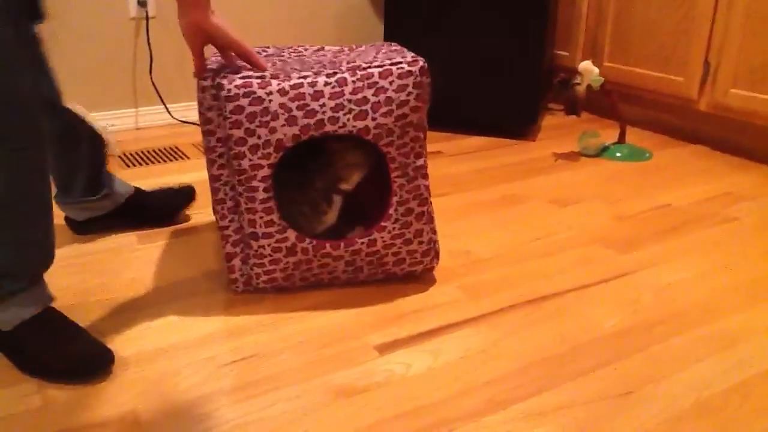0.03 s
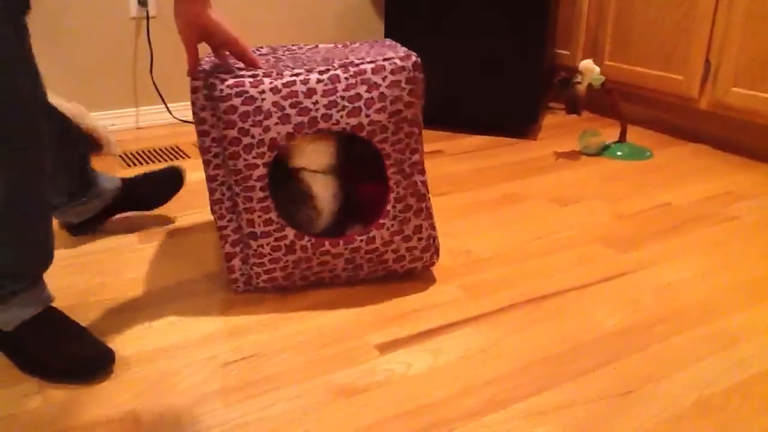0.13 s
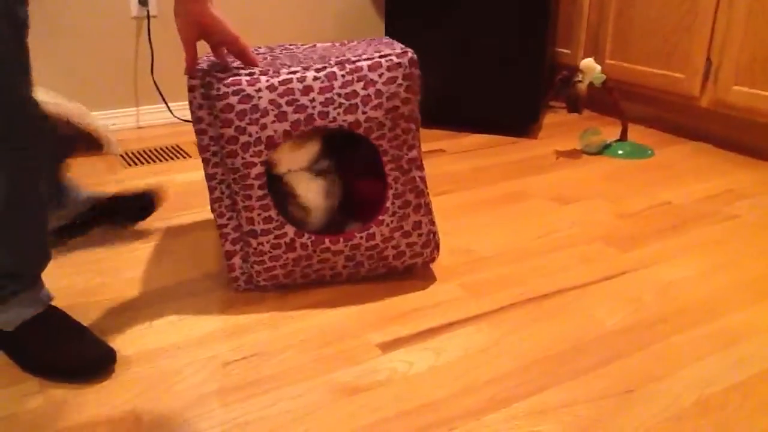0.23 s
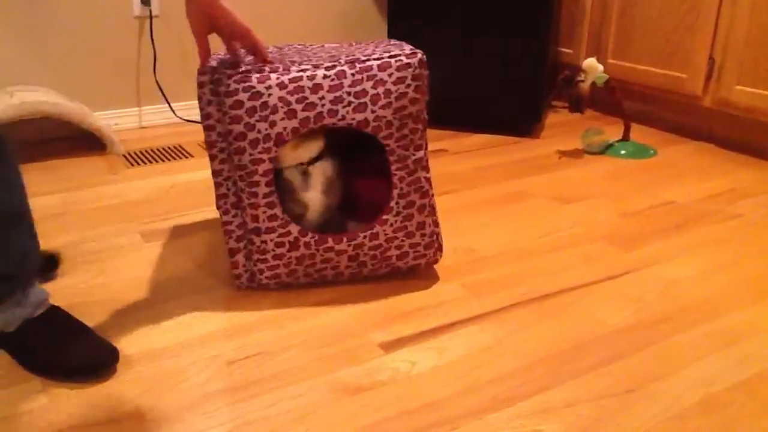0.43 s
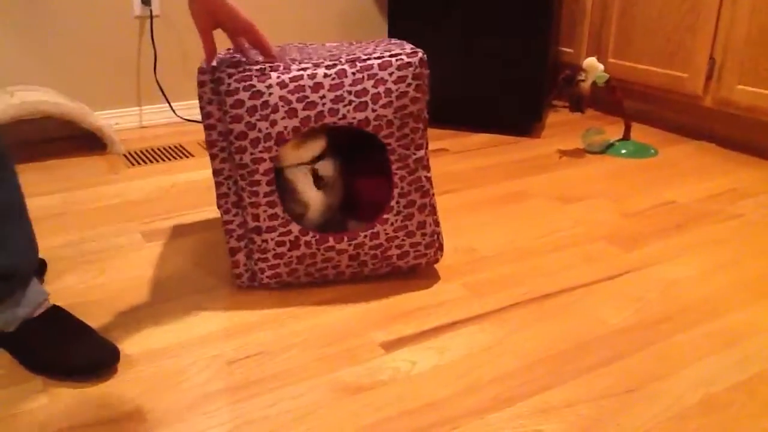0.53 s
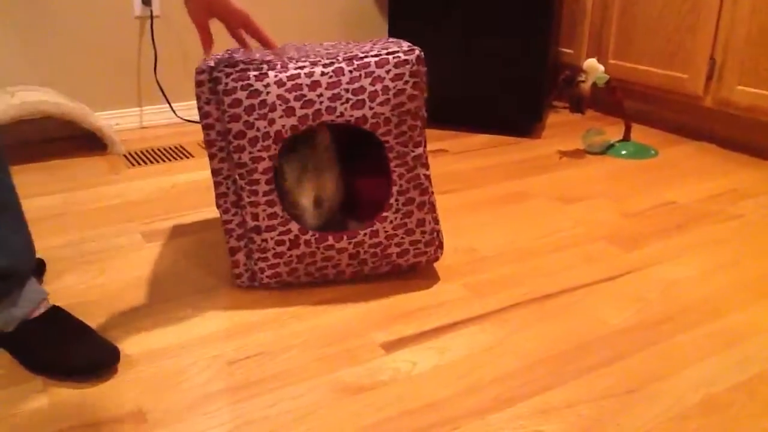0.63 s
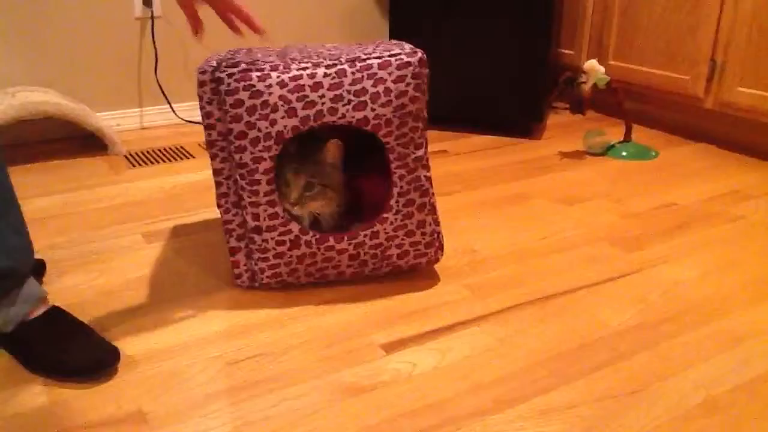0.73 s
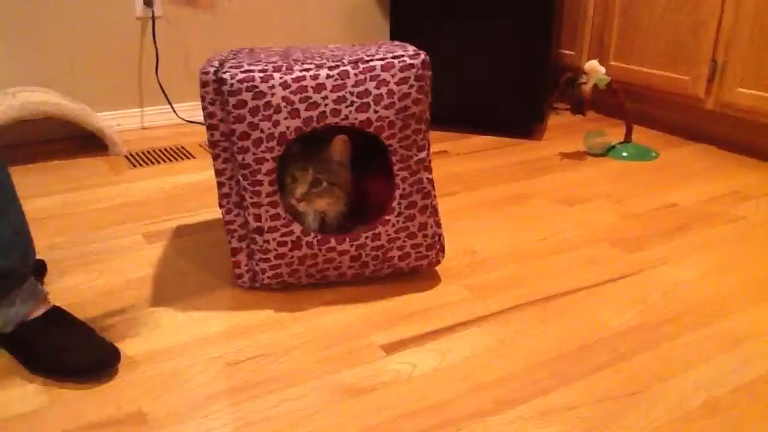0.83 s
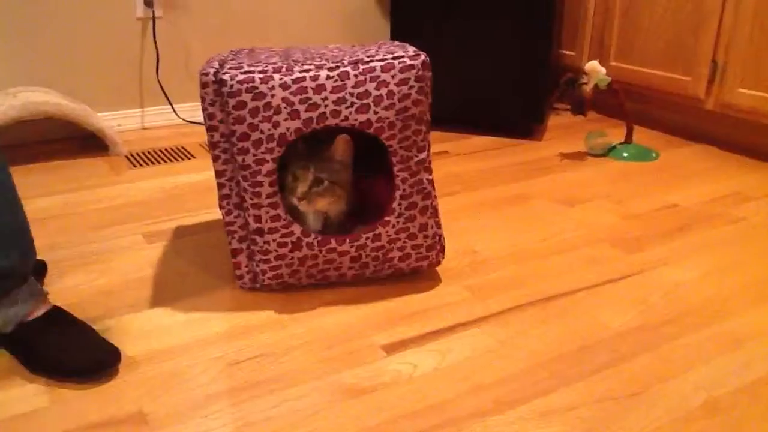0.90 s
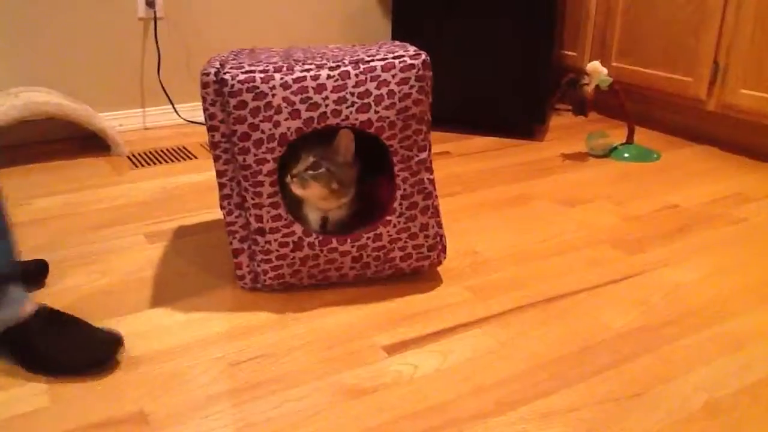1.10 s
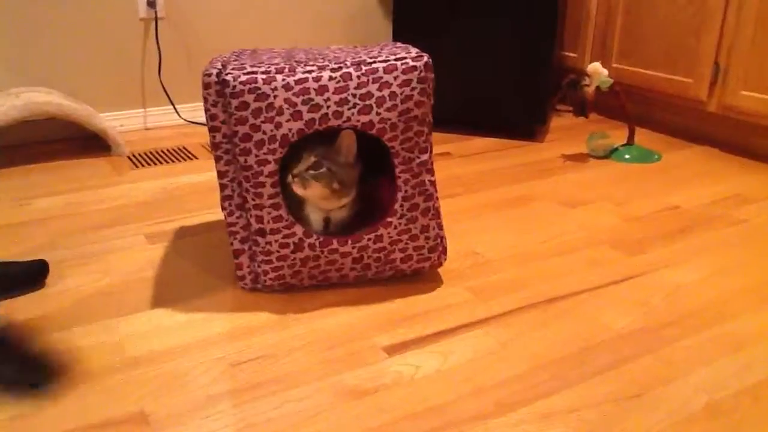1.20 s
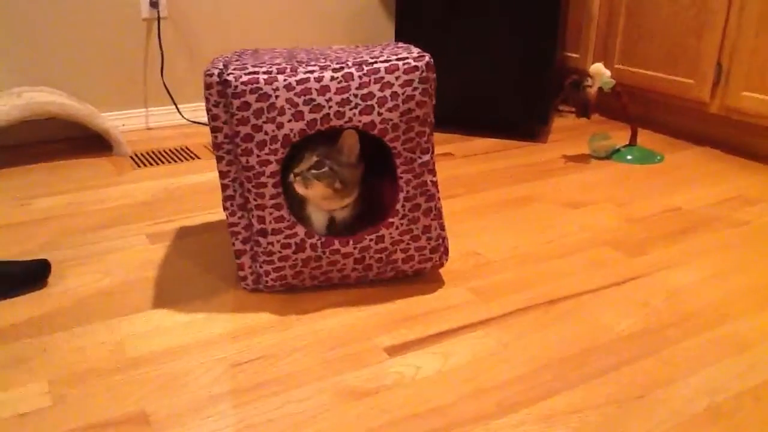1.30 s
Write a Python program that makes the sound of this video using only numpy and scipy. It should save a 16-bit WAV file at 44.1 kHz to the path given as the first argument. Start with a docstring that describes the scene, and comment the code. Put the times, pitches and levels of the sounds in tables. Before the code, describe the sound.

A kitten's small bell jingles irregularly as it shifts inside a rustling fabric cube.

```python
"""Kitten with a bell in a play cube

A kitten shifts about in a fabric cube on a wooden floor, and a tiny pellet bell jingles in uneven
bursts. Each blow of the pellet on the shell gives a choked ping with thin, longer overtones; floor
and room reflect it. Cloth rustles, a slipper scuffs and soft bumps sound over quiet room noise."""
import sys
import numpy as np
from scipy import signal
from scipy.fft import rfft, irfft
from scipy.io import wavfile

SR = 44100
rng = np.random.default_rng(int(sys.argv[2]) if len(sys.argv) > 2 else 0)


def generate_wav(signal):
    """Clip the signal to [-1, 1] and save it as 16-bit WAV at the path in sys.argv[1]."""
    frames = np.transpose(np.atleast_2d(signal))
    scaled = np.clip(frames, -1, 1) * 32767
    pcm = np.round(scaled).astype(np.int16)
    wavfile.write(sys.argv[1], SR, pcm)


N = 59535

# Room tone. Each row: frequency in Hz, relative level in dB.
ROOM_TONE_EQ = [(20, -26), (50, -32), (85, -16), (125, -2), (260, 0), (400, -1.5), (650, -7.5), (1100, -9),
                (2200, -14), (5000, -13.5), (10000, -14.5), (15000, -15.5), (16400, -21.5)]
# Appliance hum. Each row: frequency in Hz, level in dB.
HUM_TONES = [(143, -80), (251, -80.5), (377, -77), (1060, -84)]
# Near reflections. Each row: delay in seconds, gain in dB.
REFLECTIONS = [(.0034, -12), (.0052, -17.5)]

# Swells of the rustle. Each row: time in seconds, level in dB.
CLOTH_LEVEL = [(0, -61.5), (.11, -63), (.15, -63), (.23, -55.5), (.30, -61), (.37, -63), (.41, -59.5),
               (.47, -67.5), (.53, -58.5), (.60, -65), (.72, -65.5), (.85, -77), (.96, -65.5), (1.0, -59.5),
               (1.04, -63.5), (1.09, -60), (1.14, -63), (1.25, -78), (1.35, -92)]
# Tone of the fabric. Each row: frequency in Hz, relative level in dB.
CLOTH_EQ = [(40, -18), (200, -5.5), (700, -1.5), (1500, -1), (2600, -2), (5000, -1), (9000, -2),
            (14000, -10.5), (16000, -18)]
# Drags of the slipper. Each row: time in seconds, level in dB.
SLIPPER_LEVEL = [(0, -91), (.17, -75), (.22, -64.5), (.27, -69), (.31, -88), (.96, -85), (1.005, -60),
                 (1.025, -62), (1.045, -68), (1.07, -62.5), (1.13, -80), (1.35, -74)]
# Tone of the slipper. Each row: frequency in Hz, relative level in dB.
SLIPPER_EQ = [(100, -22), (300, -0.5), (700, -6), (1100, -1), (1500, 1.5), (2000, -4), (2600, -6.5),
              (4000, -8), (9000, -24)]
# Soft bumps. Each row: start in seconds, relative level in dB, treble roll-off corner in Hz.
BUMP_HITS = [(.04, -53.5, 400), (0.158, -59, 200), (0.204, -45.5, 330), (.509, -42.5, 1090),
             (.638, -42.5, 310), (0.673, -48, 326), (1.015, -52, 404), (1.179, -53.5, 605),
             (1.30, -55, 200)]
# Resonances of cube and floor. Each row: frequency in Hz, relative level in dB, T60 in seconds.
CUBE_FLOOR_MODES = [(146.3, -10, 0.11), (233, -3, .12), (300, -6, 0.13), (440, 1.5, 0.061),
                    (537, 1.5, 0.035), (658, -1.5, 0.041), (774, 3, 0.03), (874, 0.5, 0.043),
                    (977, -2.5, 0.044), (1270, -12, .06)]

# Skids of the pellet. Each row: start in seconds, level in dB, decay time in seconds.
SKIDS = [(0.12, -58.5, 0.069), (.277, -53.5, 0.034), (0.328, -47.5, 0.015), (0.382, -54.5, .012),
         (0.464, -48.5, 0.011), (.511, -59, 0.026), (0.568, -55, .008), (0.661, -53.5, 0.017)]
# Tone of a skid. Each row: frequency in Hz, relative level in dB.
SKID_EQ = [(1000, -28), (4000, -14), (5000, -1), (6600, 4), (7600, -7), (10000, -4), (12500, -9),
           (15000, -1), (16000, -12)]
# The pellet rolling between blows. Each row: time in seconds, relative level in dB.
ROLL_LEVEL = [(0, -67), (.17, -63), (.27, -61), (.315, -44), (.39, -45), (.43, -54), (.50, -51), (.60, -65),
              (.68, -58.5), (.73, -55), (.82, -53), (.95, -70), (1.35, -85)]
# Blows of the pellet. Each row: start in seconds, ping pitch in Hz, then relative levels in dB
# of the ping, the bright overtones and the side overtones.
PELLET_BLOWS = [ (.1375, 6400, -47, -78, -87), (0.153, 5800, -37, -72, -80), (.1935, 5540, -35, -60, -75),
                (0.2024, 5600, -37.5, -58, -75), (0.2193, 5533, -16, -38, -68),
                (.2328, 5750, -30.5, -47, -75), (0.2759, 5580, -30, -42, -55),
                (.2805, 5750, -32, -47.5, -58), (.2830, 5616, -32.5, -64, -60),
                (0.2896, 5600, -15.5, -72, -66), (0.2983, 5540, -21.5, -66, -72),
                (0.3041, 5590, -39, -53, -76), (0.3111, 5530, -30, -55, -72), (0.3166, 5500, -36, -50, -69),
                (0.3223, 5440, -34, -53, -70), (0.3299, 5650, -24, -55, -51.5),
                (0.3327, 5400, -31, -54, -71), (0.3526, 5620, -24, -55, -68),
                (.3625, 5673, -41.5, -58, -60), (0.3795, 5590, -34, -56, -72),
                (0.3882, 5760, -41, -54, -59), (0.3955, 5510, -33, -48, -64), (.4098, 5560, -40, -58, -73),
                (0.4348, 5660, -29.5, -52, -62), (.4550, 5650, -37.5, -64, -72),
                (0.4585, 5620, -26, -47, -39.5), (0.4616, 5500, -26.5, -76, -66),
                (.4665, 5710, -29, -61, -58), (0.4695, 5590, -19.5, -54, -48.5),
                (0.474, 5540, -31, -62, -77), (.4787, 5730, -46, -60, -81), (0.4894, 5560, -51, -61, -62),
                (0.5119, 5620, -34.5, -46, -66), (0.5197, 5680, -31, -61, -66),
                (0.5224, 5670, -36, -69, -70), (0.5592, 5700, -38.5, -60, -61),
                (0.5693, 5620, -39.5, -64, -55), (0.5736, 5680, -41, -68, -70),
                (0.6274, 5620, -34, -63, -78), (0.6526, 5730, -35, -55, -75),
                (.6593, 5647, -35.5, -56, -68), (0.6977, 5540, -37, -59, -78), (.7000, 5720, -30, -57, -83),
                (0.7094, 5717, -37, -66, -79), (0.7123, 5910, -32, -62, -74), (0.7163, 5730, -31, -52, -76),
                (0.7203, 5770, -26.5, -66, -76), (0.7263, 5730, -24.5, -58, -63),
                (0.733, 5764, -47, -54, -80), (0.7619, 5880, -27, -74, -75), (0.767, 5620, -35, -75, -83),
                (.7900, 5720, -26.5, -56, -83), (.7930, 5660, -29, -63, -76), (0.8094, 6000, -45, -59, -63),
                (0.8154, 5470, -45, -52, -78), (0.8267, 5670, -35.5, -67, -78),
                (0.841, 5780, -45, -77, -80), (0.8761, 5700, -37, -61, -78), (0.8905, 5653, -25, -58, -80),
                (0.9002, 5658, -38.5, -73, -76), (.9908, 5710, -33.5, -70, -78),
                (1.0457, 5820, -38.5, -70, -78), (1.1690, 5786, -43.5, -55, -77),
                (1.1983, 5595, -38.5, -72, -80), (1.2027, 5700, -47, -78, -80),
                (1.2190, 5770, -42.5, -73, -83)]
# Shell modes: two sets of overtones and a faint ring that outlasts the ping.
# Each row: frequency in Hz, relative level in dB, T60 in seconds.
BRIGHT_MODES = [(13140, -4.5, 0.094), (13350, 1.5, 0.041), (14200, -15, 0.026), (14930, -13, .04)]
SIDE_OVERTONE_MODES = [(11435, -4.5, 0.11), (11000, -13, 0.058), (11570, -11.5, 0.16), (7800, -8.5, 0.019),
                       (15000, -13, 0.03)]
AFTER_RING_MODES = [(5600, -24.5, 0.1), (5620, -27, 0.12), (5860, -35, 0.1), (6446, -41.5, 0.14)]
# How well the shell radiates around its main note. Each row: frequency in Hz, gain in dB.
SHELL_EQ = [(1000, -20), (4400, -2.5), (4850, -5), (5150, 0.5), (5850, -0.5), (6080, -2), (6500, 5),
            (7200, 7), (9000, -12), (16000, -10)]
# How freely the bell hangs; fur chokes it when the kitten is still.
# Each row: time in seconds, factor on ping length (squared, on overtone and after-ring gain).
BELL_FREEDOM = [(.15, 0.45), (.2, 0.98), (.47, 1.074), (.89, 0.951), (.99, 0.697), (1.2, 0.66)]

PING_RISE_S, PING_T60_S = 0.0016, 0.015  # at a freedom of 1


def undb(db):
    """Decibels to gain."""
    return 10 ** (np.asarray(db) / 20)


def unit(x):
    """Scale to rms 1."""
    return x / np.sqrt(np.mean(x ** 2))


def fade(t, t60):
    """Exponential decay, 60 dB down after t60 seconds."""
    return np.exp(-np.log(1000) * t / t60)


def envelope(rows):
    """Gain over time from (s, dB) points."""
    return undb(np.interp(np.arange(N) / SR, *np.array(rows).T))


def eq(x, points):
    """Filter x by a curve of (Hz, dB) points."""
    hz, db = np.array(points).T
    bins = np.maximum(np.fft.rfftfreq(N, 1 / SR), 1)
    return irfft(rfft(x) * undb(np.interp(np.log(bins), np.log(hz), db)), N)


def noise(points):
    """Noise through an EQ curve, at rms 1."""
    return unit(eq(rng.standard_normal(N), points))


def crackle(per_s):
    """Clicks of random timing and strength."""
    return (rng.random(N) < per_s / SR) * rng.standard_normal(N)


def add(out, start, x):
    """Mix x into out from a start time in seconds."""
    i = int(start * SR)
    out[i:i + len(x)] += x[:N - i]


def ring(modes, t, phases):
    """Struck modes ring out as decaying sines."""
    return sum(undb(db) * fade(t, t60) * np.sin(2 * np.pi * (hz * t + phase))
               for (hz, db, t60), phase in zip(modes, phases))


def room_tone(air_db=-62):
    """A quiet bed of air with a faint appliance hum."""
    t = np.arange(N) / SR
    hum = sum(undb(db) * np.sqrt(2) * np.sin(2 * np.pi * (hz * t + rng.random()))
              for hz, db in HUM_TONES)
    return undb(air_db) * noise(ROOM_TONE_EQ) + hum


def room_reverb(x, tail_db=-10.5, t60_s=0.38, predelay_s=0.006):
    """Floor and room add two near reflections and a short diffuse tail."""
    t = np.arange(SR // 2) / SR
    tail = rng.standard_normal(len(t)) * fade(t, t60_s)
    response = np.zeros(N)
    add(response, predelay_s, undb(tail_db) * tail / np.linalg.norm(tail))
    for delay, db in REFLECTIONS:
        add(response, delay, undb([db]))
    return x + signal.fftconvolve(x, response)[:N]


def cloth_rustle(snaps_per_s=900, snap_gain=0.54):
    """Fabric rubs: a hiss textured with tiny fibre snaps."""
    snaps = snap_gain * unit(crackle(snaps_per_s))
    hiss = rng.standard_normal(N)
    return envelope(CLOTH_LEVEL) * unit(eq(hiss + snaps, CLOTH_EQ))


def slipper_scuff():
    """A slipper drags over the boards in swells of midrange friction noise."""
    return envelope(SLIPPER_LEVEL) * noise(SLIPPER_EQ)


def floor_bumps(attack_s=0.0021, low_cut_hz=123):
    """Paws, feet and the rocking cube bump the floor; softer contact is duller."""
    out, t = np.zeros(N), np.arange(SR // 3) / SR
    attack = np.minimum(t / attack_s, 1)
    for start, db, corner_hz in BUMP_HITS:
        dulled = [(hz, mode_db - 10 * np.log10(1 + (hz / corner_hz) ** 8), t60)
                  for hz, mode_db, t60 in CUBE_FLOOR_MODES]
        add(out, start, undb(db) / 2 * attack * ring(dulled, t, rng.random(len(dulled))))
    return signal.sosfilt(signal.butter(3, low_cut_hz, "highpass", fs=SR, output="sos"), out)


def pellet_skids():
    """Short bright rasps as the pellet skids along the shell."""
    pressure, t = np.zeros(N), np.arange(SR // 8) / SR
    for start, db, decay_s in SKIDS:
        progress = t / decay_s
        add(pressure, start, undb(db) * np.minimum(10 * progress, 1) * np.exp(-progress ** 2))
    return pressure * noise(SKID_EQ)


def ping(hz, t, freedom):
    """The shell's main note: a snap of an attack and a fast decay, both shorter when choked."""
    rise_s = PING_RISE_S * freedom
    attack = np.sin(np.pi / 2 * np.minimum(t / rise_s, 1)) ** 2
    since_peak = t - rise_s
    decay = fade(np.maximum(since_peak, 0), PING_T60_S * freedom)
    return attack * decay * np.sin(2 * np.pi * hz * since_peak)


def pellet_roll(t, contacts_per_s=700, pitch_hz=5657):
    """The rolling pellet sets off a shimmer of tiny pings."""
    contacts = crackle(contacts_per_s) * envelope(ROLL_LEVEL)
    return signal.fftconvolve(contacts, ping(pitch_hz, t, freedom=0.98))[:N]


def bell(tick_relative_db=-39, tick_t60_s=0.008):
    """The pellet rolls and strikes the shell: each blow is a contact tick, a ping and ringing modes."""
    notes, treble, t = np.zeros(N), np.zeros(N), np.arange(SR // 4) / SR
    attack = np.minimum(t / PING_RISE_S, 1)
    roll = pellet_roll(t)
    for start, hz, db, bright_db, side_db in PELLET_BLOWS:
        phases = rng.random((3, len(SIDE_OVERTONE_MODES)))
        freedom = np.interp(start, *np.array(BELL_FREEDOM).T)
        ring_gain = freedom ** 2 * attack
        bright = undb(bright_db) * ring(BRIGHT_MODES, t, phases[0])
        side = undb(side_db) * ring(SIDE_OVERTONE_MODES, t, phases[1])
        after_ring = ring(AFTER_RING_MODES, t, phases[2])
        tick = undb(db + tick_relative_db) * fade(t, tick_t60_s) * rng.standard_normal(len(t))
        add(notes, start, undb(db) * (ping(hz, t, freedom) + ring_gain * after_ring))
        add(treble, start, tick + ring_gain * (bright + side))
    return eq(notes + roll, SHELL_EQ) + treble


def scene():
    """Mono mix: bumps and bell get the reverb; room tone, cloth and slipper stay dry."""
    bed = room_tone() + cloth_rustle()
    action = room_reverb(floor_bumps() + bell() + pellet_skids())
    return (bed + action + slipper_scuff())[None]


def record(dry):
    """A steep low-pass takes the very top off the mix."""
    high_cut_hz = 15600
    return signal.sosfilt(signal.ellip(8, .2, 60, high_cut_hz, fs=SR, output="sos"), dry)


dry = scene()
out = record(dry)
generate_wav(out)
```